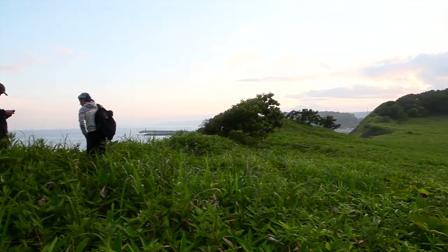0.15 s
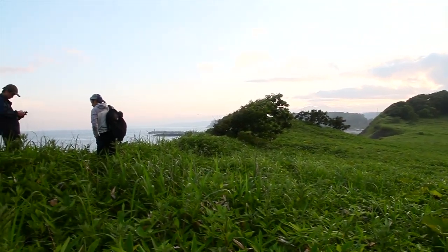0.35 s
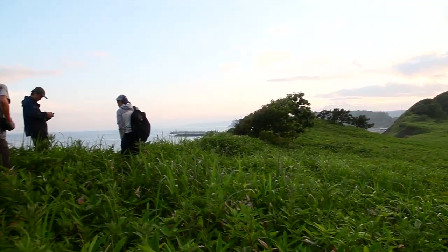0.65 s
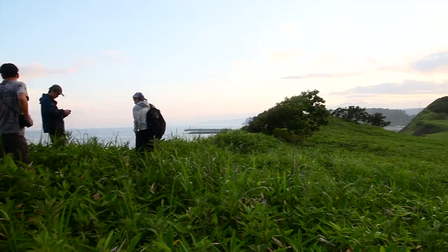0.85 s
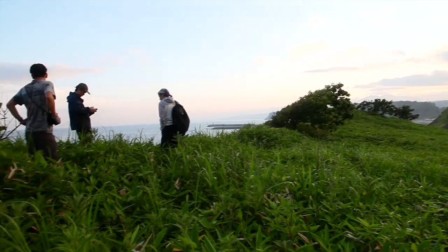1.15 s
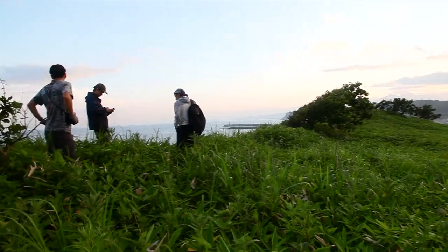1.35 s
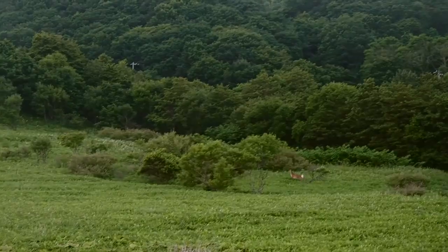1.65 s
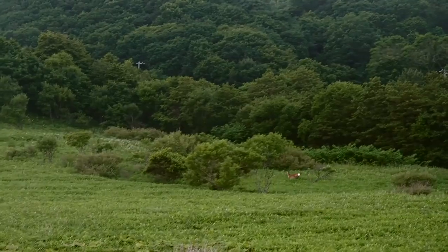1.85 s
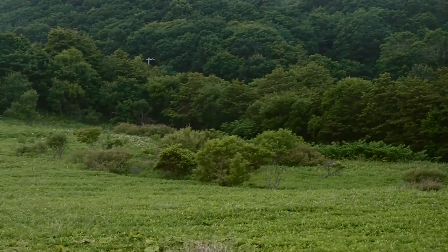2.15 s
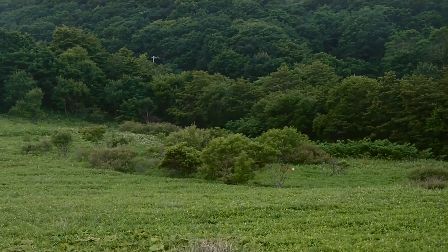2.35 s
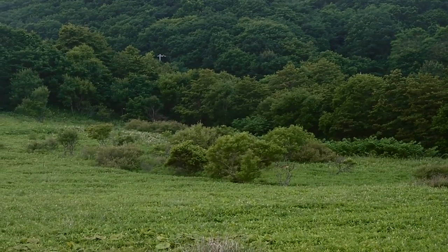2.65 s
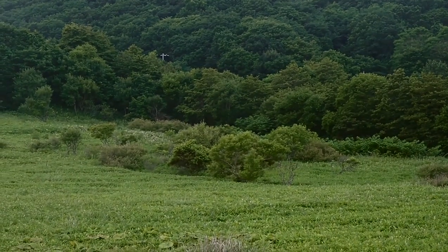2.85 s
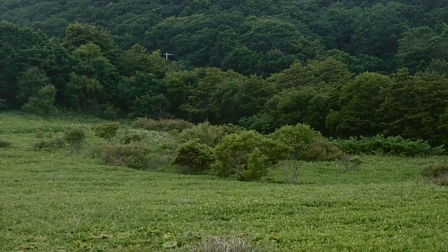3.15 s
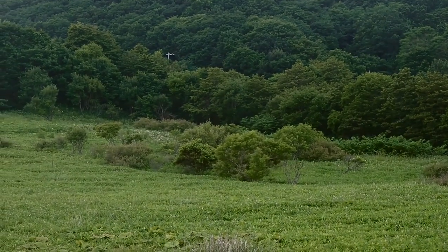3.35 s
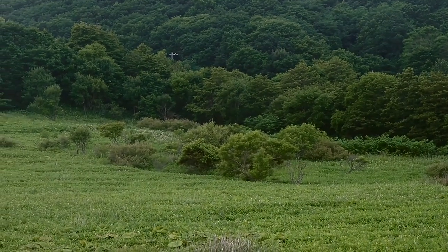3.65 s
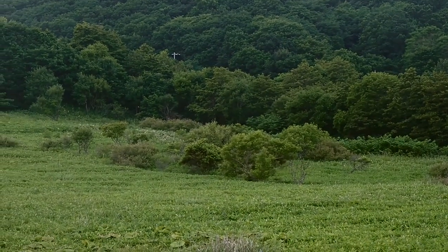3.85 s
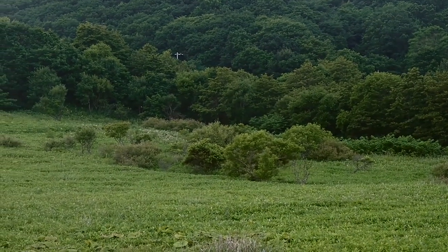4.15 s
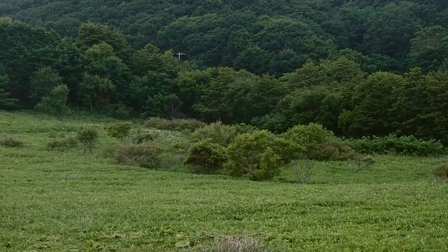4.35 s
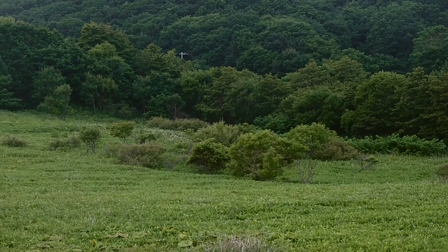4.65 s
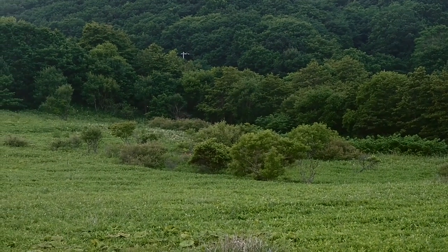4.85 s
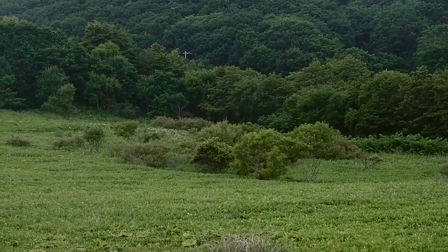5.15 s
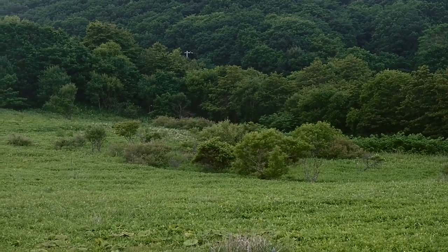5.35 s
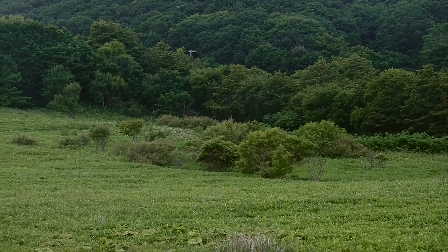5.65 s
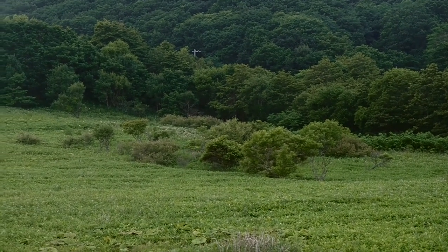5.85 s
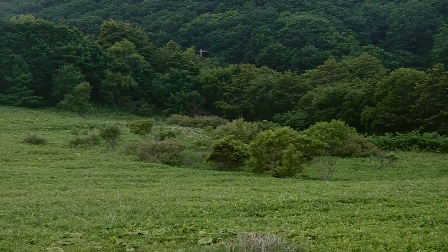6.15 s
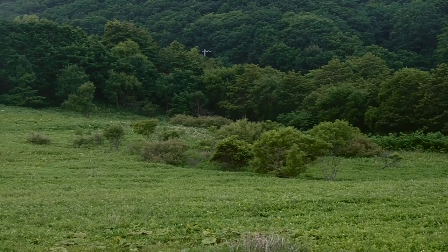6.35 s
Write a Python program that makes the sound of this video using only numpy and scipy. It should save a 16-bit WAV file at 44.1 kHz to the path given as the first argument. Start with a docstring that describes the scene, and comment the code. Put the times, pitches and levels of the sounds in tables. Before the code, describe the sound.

A grassy hillside full of high insect buzzing and quick falling chirps, under gusty microphone rumble, fading gradually and recovering slightly near the end.

```python
"""Wind on a grassy hillside rumbles on the microphone: low-passed noise in gusts, nearly alike on both sides.
A bush cricket buzzes very high, other insects rattle in trills, and near and distant singers chirp downwards:
ringing wings and sliding whistles, scattered by diffuse tails. For a second and a half tall grass hisses close by;
then the view is an open meadow with the soft rush of distant woods, both made of fluttering bands of noise."""
import sys
import numpy as np
from scipy import signal
from scipy.fft import rfft, irfft
from scipy.io import wavfile
from scipy.ndimage import uniform_filter1d

SR = 44100
rng = np.random.default_rng(int(sys.argv[2]) if len(sys.argv) > 2 else 0)


def waveform_to_disk(signal):
    """Save audio, clipped to [-1, 1], as 16-bit WAV at the path in sys.argv[1]."""
    frames = np.transpose(np.atleast_2d(signal))
    scaled = np.clip(frames, -1, 1) * 32767
    samples = np.round(scaled).astype(np.int16)
    wavfile.write(sys.argv[1], SR, samples)


N = 286650
TIME = np.arange(N) / SR
# source levels in dB, before the overall level curve
WIND_DB, GRASS_DB, WOODS_DB = -33, -44, -47.5
BUZZ_DB, SIZZLE_DB = -39.1, -49.6
NEAR_TRILL_DB, STEADY_TRILL_DB, FAR_TRILL_DB = -40.8, -46.2, -44.2
NEAR_CHIRP_DB, CHORUS_DB = -40.1, -47.9


def wind():
    """Eddies press on both sides of the microphone nearly alike, more strongly in the tall grass."""
    # rumble spectrum: (frequency [Hz], level [dB])
    rumble = [(8, -8), (20, 2.5), (32, 0), (58, -2), (75, -7), (100, -9.5), (150, -14.5), (210, -27.5),
              (400, -39), (1000, -65)]
    # rises and dips around the steady wind: (time [s], half length [s], level [dB])
    gusts = [(0.22, 0.054, 1.5), (0.44, 0.032, 1.5), (0.72, 0.019, 6), (0.98, 0.044, 3), (1.25, 0.045, 0.5),
             (2.6, 0.1, 3), (3.03, 0.074, 1), (3.39, 0.053, 1.5), (3.8, 0.036, -2.5), (4.12, .12, 1),
             (4.85, 0.21, 1), (6.28, 0.066, 0)]
    # broad, slow dips in wind level: (time [s], half length [s], depth [dB])
    slow_dips = [(2.5, .6, 2), (5.1, .4, 1.5)]
    eddies = unit(colour(rng.standard_normal(N), rumble))
    # even out each passing group of eddies, so that the gust sets its strength
    eddies /= np.sqrt(uniform_filter1d(eddies ** 2, size=SR // 5))
    apart = unit(colour(rng.standard_normal((2, N)), rumble))
    exposed_db = 0.6 * in_grass()
    waver_db = 1 * walk(5.09)
    gust_db = humps(gusts) - humps(slow_dips) + exposed_db + waver_db
    return (eddies + undb(-18.5) * apart) * undb(WIND_DB + gust_db)


def bush_cricket():
    """A very steady buzz, rung by a small stiff wing and scattered by the stems around it."""
    # wing resonance: (frequency [Hz], level [dB])
    wing = [(10000, -45), (12500, -25), (13250, -14), (13500, -3), (14200, -2), (14400, 0), (15030, 0),
            (15170, -15), (16000, -36)]
    # the buzz softens now and then: (time [s], half length [s], depth [dB])
    lulls = [(0.08, 0.13, 1.5), (0.8, 0.35, 4), (1.95, 0.18, 5), (4.3, 0.55, 3.5)]
    strokes = wing_strokes(rate=120, hz=14730, wobble=.001, uneven_db=.4, grit_db=-4)
    song = scatter(colour(strokes, wing), t60=0.04, wet_db=-7.5)
    return place(unit(song), pan_db=2.7, lag_ms=-0.0077) * undb(BUZZ_DB - humps(lulls))


def wing_strokes(rate, hz, wobble, uneven_db, grit_db):
    """Each stroke drags a file over a scraper: the wing rings in a short strong burst, then in weaker ones."""
    # bursts within one stroke: (position [share of the stroke], level [dB])
    bursts = [(.25, -1), (.35, -.5), (.52, -5), (.75, -9)]
    burst_share, rest_db = .047, -17  # burst width [share of the stroke], scrape between bursts [dB]
    spread_hz, teeth_per_s = 240, 1100  # how the ring wavers from tooth to tooth
    cycles = stroke_cycles(rate, wobble)
    push = undb(rest_db)
    for at, db in bursts:
        push = push + undb(db) * np.exp(-((cycles % 1 - at) / burst_share) ** 2 / 2)
    size = undb(uneven_db * rng.standard_normal(N // 100))[cycles.astype(int)]
    pitch = hz + spread_hz * walk(teeth_per_s)
    ring = np.sin(2 * np.pi * np.cumsum(pitch) / SR)
    return push * size * (ring + undb(grit_db) * rng.standard_normal(N))


def stroke_cycles(rate, wobble):
    """Running count of wing strokes at a wavering pace; the fraction is the place within a stroke."""
    return np.cumsum(rate * (1 + wobble * walk(12))) / SR + rng.random()


def trills():
    """The nearest singer rattles in bouts; a second, lower one sings on; five more waver further away."""
    # wing resonance of the two closer singers: (frequency [Hz], level [dB])
    wing = [(6800, -22), (7900, 21), (8350, -10.5), (8700, 11), (8950, -23), (10000, -24)]
    # wing resonance of the far singers: (frequency [Hz], level [dB])
    far_wing = [(5500, -27), (6700, -5.5), (7400, -5.5), (7900, -2), (8350, 6), (8650, 6.5), (8950, -15),
                (9300, -61), (10000, -28)]
    # short dips in the closer trills; at the last two only the steady one sings:
    # (time [s], half length [s], depth [dB])
    short_dips = [(3.26, 0.026, 7), (3.82, 0.11, 13), (5.72, 0.074, 18)]

    near = rattle(rate=104.2, hz=8290, wobble=0.015, uneven_db=2.0, spread=.012, grit_db=-12)
    near = near * undb(1.5 * walk(14))
    near = unit(scatter(colour(near, wing), t60=0.033, wet_db=-15))
    near = place(near, pan_db=2.4, lag_ms=0.18) * trill_bouts()

    steady = rattle(rate=102.8, hz=7930, wobble=.012, uneven_db=1.5, spread=.01, grit_db=-12)
    steady = steady * undb(1.8 * walk(14))
    steady = unit(scatter(colour(steady, wing), t60=0.034, wet_db=-9))
    steady = place(steady, pan_db=0, lag_ms=0.18)

    far = np.zeros(N)
    for hz in np.linspace(7250, 8400, 5):
        rate = 102 * rng.uniform(.85, 1.15)
        singer = rattle(rate, hz=hz, wobble=.03, uneven_db=2.5, spread=.02, grit_db=0)
        far += singer * undb(2.5 * walk(12))
    far = unit(colour(scatter(far, t60=.06, wet_db=-2), far_wing))
    far = place(far, pan_db=3.8, lag_ms=0.16)

    close = near * undb(NEAR_TRILL_DB) + steady * undb(STEADY_TRILL_DB)
    return close * undb(-humps(short_dips)) + far * undb(FAR_TRILL_DB)


def trill_bouts():
    """1 while the near singer rattles, 0 between bouts, with a slow attack and a quicker release."""
    # bouts: (start [s], end [s])
    bouts = [(-.3, 0.45), (1.55, 3.57)]
    attack_s, release_s = .3, 0.064
    singing = np.zeros(N)
    for start, end in bouts:
        edge = np.minimum((TIME - start) / attack_s, (end - TIME) / release_s)
        singing += np.clip(edge + .5, 0, 1)
    return singing


def rattle(rate, hz, wobble, uneven_db, spread, grit_db):
    """Each wing stroke rings briefly and slides down in pitch as the file slows on the scraper."""
    stroke_s, fall_hz_per_s = .0018, 128000  # half length and slide of one stroke
    cycles = stroke_cycles(rate, wobble)
    size, detune = rng.standard_normal((N // 100, 2))[cycles.astype(int)].T
    t = (cycles % 1 - .5) / rate  # seconds from the middle of the stroke
    pitch = hz * (1 + spread * detune) - fall_hz_per_s * t
    tone = np.sin(2 * np.pi * np.cumsum(pitch) / SR)
    grit = rng.standard_normal(N)
    return np.exp(-(t / stroke_s) ** 2 / 2) * undb(uneven_db * size) * (tone + undb(grit_db) * grit)


def chirpers():
    """Near singers chirp in evenly paced runs in front of a crowd of faint ones of the same kind."""
    # near runs, steady or hurried: (start [s], length [s], pace [chirps/s], pitch [Hz], strength [dB])
    runs = [(0.061, .36, 12.3, 3690, .5), (0.12, .18, 17, 3820, -1.5), (0.463, .15, 15, 3580, -3),
            (0.85, .17, 21.5, 3570, -2.5), (1.08, .52, 12.4, 3590, -1.5), (1.637, .06, 20.7, 3590, -2.5),
            (1.733, .07, 19, 3600, 2.5), (1.858, .12, 19.5, 3600, -1), (2.053, .07, 23, 3590, -.5),
            (2.178, .52, 12.5, 3610, 1.5), (2.701, .37, 20.4, 3590, 1.5), (3.128, .2, 12.3, 3590, .5),
            (3.372, .2, 12.9, 3590, -4), (3.643, .18, 17.9, 3620, -3), (4.17, .54, 12.1, 3560, -2.5),
            (4.77, .02, 12, 3600, -2), (4.934, .07, 20, 3580, -1.5), (5.075, .14, 18.8, 3590, -.5),
            (5.448, .77, 12.25, 3590, .3), (5.93, .2, 12.5, 3760, -3.5), (6.09, .26, 13, 3880, -3.5),
            (6.228, .25, 18.4, 3590, 0)]
    # level of the distant crowd: dips (time [s], half length [s], depth [dB])
    crowd_dips = [(1.5, 0.73, 4), (5.2, 0.99, 3)]
    near = sum(chirp_run(*run) for run in runs)
    near = place(scatter(near, t60=0.21, wet_db=-12.5), pan_db=2.0, lag_ms=0.081)
    crowd = sum(distant_singer(hz) for hz in np.linspace(3300, 4100, 13))
    crowd = place(unit(scatter(crowd, t60=0.25, wet_db=-1.5)), pan_db=0, lag_ms=.07)
    return near * undb(NEAR_CHIRP_DB) + crowd * undb(CHORUS_DB - humps(crowd_dips))


def chirp_run(start, length, rate, hz, db):
    """One near singer repeats its chirp at an even pace, each a little louder or softer."""
    beats = start + np.arange(0, length, 1 / rate)
    rows = [(s, db + 1 * rng.standard_normal()) for s in beats]  # 1 dB scatter
    return chirp_train(rows, hz=hz, spread=0.009, fall_hz_per_s=15000, rise=.008, decay=0.0062)


def distant_singer(hz):
    """An unbroken run of chirps loosely keeping one pace, some carrying further than others."""
    # how loud the crowd is at each pitch: (pitch [Hz], relative level [dB])
    loudness = [(3300, -4), (3420, -2), (3550, 0), (3780, 1), (3920, -1.5), (4100, -4)]
    period = 1 / rng.uniform(12, 20)  # 12 to 20 chirps per second
    beats = np.arange(period * rng.random(), N / SR, period)
    late, strength = rng.standard_normal((200, 2))[:len(beats)].T
    rows = list(zip(beats + .1 * period * late, 2 * strength))  # 2 dB scatter
    song = chirp_train(rows, hz=hz, spread=.018, fall_hz_per_s=16100, rise=0.009, decay=0.0065)
    return song * undb(along(loudness, hz))


def chirp_train(rows, hz, spread, fall_hz_per_s, rise, decay):
    """Whistles sliding down in pitch, ending quicker than they swell, each with its own slide and length."""
    length_spread, slide_spread = .15, .2  # from chirp to chirp, as shares
    t = np.arange(-SR // 32, SR // 32) / SR
    width = np.where(t < 0, rise, decay)
    out = np.zeros(N + 2 * len(t))
    for (s, db), (detune, turn, slide, stretch) in zip(rows, rng.standard_normal((len(rows), 4))):
        shape = np.exp(-(t / (width * np.exp(length_spread * stretch))) ** 2 / 2)
        pitch = hz * (1 + spread * detune)
        fall = fall_hz_per_s * (1 + slide_spread * slide)
        phase = pitch * t - fall * t ** 2 / 2 + turn  # in turns
        start = int(np.clip(s * SR, 0, N))
        out[start:start + len(t)] += undb(db) * shape * np.sin(2 * np.pi * phase)
    return out[len(t) // 2:][:N]


def plants():
    """Brushing blades of tall grass close by give way to the rush of woods across the meadow."""
    # spectra: (frequency [Hz], level [dB])
    grass_spectrum = [(90, -9), (200, 4.5), (300, 4), (450, 1.1), (700, 1.1), (1200, -3.5), (2000, -7.5),
                      (3000, -9.5), (5000, -11.5), (7000, -14), (9500, -16), (12000, -16.5), (16000, -24)]
    woods_spectrum = [(90, -11), (200, -1.5), (265, 1.5), (350, -5), (500, -0.4), (580, -3.5), (720, 0.5),
                      (1000, -5), (1230, -5), (1550, -10), (2200, -12), (3000, -15.5), (5000, -17.5),
                      (6500, -23.5), (10000, -24), (16000, -38)]
    # likeness of left and right: (frequency [Hz], correlation [-])
    grass_likeness = [(200, 0.86), (700, 0.84), (2000, 0.66), (4000, 0.33), (6000, 1), (12000, 0.67)]
    woods_likeness = [(200, 0.93), (700, 0.95), (1200, 1), (2000, 0.14), (6000, 0.72)]
    close = in_grass()
    grass = foliage(grass_spectrum, grass_likeness, flutter_db=1.08, flutter_rate=14.3)
    grass = place(grass, pan_db=2.0, lag_ms=0)
    woods = foliage(woods_spectrum, woods_likeness, flutter_db=1.17, flutter_rate=9)
    woods = place(woods, pan_db=0.0, lag_ms=.16)
    return grass * close * undb(GRASS_DB) + woods * (1 - close) * undb(WOODS_DB)


def foliage(spectrum, likeness, flutter_db, flutter_rate):
    """Countless brushing leaves: shaped stereo noise in octave bands that each flutter on their own."""
    hz = np.fft.rfftfreq(N, 1 / SR)
    alike = np.clip(along(likeness, hz), 0, 1)
    mid, side = rfft(rng.standard_normal((2, N)))
    shared = mid * np.sqrt(1 + alike)
    opposed = np.array([[1], [-1]]) * side * np.sqrt(1 - alike)
    pair = (shared + opposed) * undb(along(spectrum, hz))
    # rms 1 in the middle range, before the flutter
    pair /= np.std(irfft(pair * ((hz > 400) & (hz < 1500)), N))
    octave = np.log2((hz + 1) / 125)
    out = np.zeros((2, N))
    for k in range(8):
        band = irfft(pair * np.maximum(1 - abs(octave - k), 0), N)
        out += band * undb(flutter_db * walk(flutter_rate))
    return out


def in_grass():
    """1 while the tall grass is close, 0 once the view is the meadow, with a 17 ms crossing."""
    return np.clip((1.51 - TIME) / 0.017 + .5, 0, 1)


def far_crickets():
    """Further bush crickets, each at its own pace and a lower pitch, blur into a sizzle from all sides."""
    # wing resonance: (frequency [Hz], level [dB])
    wing = [(10000, -40), (11900, -14), (12350, -2), (13000, 0), (13230, -7), (13500, -1), (15000, -2),
            (15200, -20), (16000, -40)]
    # singers: (pitch [Hz], pace [strokes/s], relative strength [dB])
    crickets = [(12520, 92, 0), (12950, 134, 1), (13650, 109, -1.5), (14100, 142, -1)]
    singers = np.zeros(N)
    for hz, rate, db in crickets:
        strokes = wing_strokes(rate, hz=hz, wobble=0.056, uneven_db=4.0, grit_db=-2)
        singers += strokes * undb(db + 2.9 * walk(7.7))
    return unit(scatter(colour(singers, wing), t60=0.14, wet_db=11)) * undb(SIZZLE_DB)


def scatter(x, t60, wet_db):
    """Stems and slopes add a diffuse tail, different on each side."""
    t = TIME[:SR // 2]
    tail = rng.standard_normal((2, len(t))) * np.exp(-np.log(1000) * t / t60)
    tail /= np.sqrt(np.sum(tail ** 2, axis=1, keepdims=True))
    return x + undb(wet_db) * signal.fftconvolve(x[None], tail, axes=1)[:, :N]


def place(pair, pan_db, lag_ms):
    """Direction: positive values make the left louder by pan_db and later by lag_ms."""
    left = delay(pair[0], lag_ms / 1000) * undb(pan_db / 2)
    right = pair[1] * undb(-pan_db / 2)
    return np.array([left, right])


def delay(x, seconds):
    """Shift a sound in time by turning the phase of its spectrum."""
    return irfft(rfft(x) * np.exp(-2j * np.pi * np.fft.rfftfreq(N, 1 / SR) * seconds), N)


def colour(x, points):
    """Filter by a spectrum of (frequency [Hz], level [dB]) points."""
    return irfft(rfft(x) * undb(along(points, np.fft.rfftfreq(N, 1 / SR))), N)


def along(points, hz):
    """Read (frequency [Hz], value) points on a log-frequency axis."""
    f, value = np.transpose(points)
    return np.interp(np.log(hz + 1), np.log(f), value)


def walk(rate):
    """Random levels held 1 / rate s and smoothed twice; rms 1."""
    k = max(int(SR / rate), 1)
    held = np.repeat(rng.standard_normal(N // k + 2), k)[rng.integers(k):][:N]
    return unit(uniform_filter1d(uniform_filter1d(held, k), k))


def humps(rows):
    """Smooth bell-shaped humps from rows of (time [s], half length [s], height [dB])."""
    return sum(db * np.exp(-((TIME - s) / half) ** 2) for s, half, db in rows)


def curve(rows):
    """Rows of (time [s], value) as a value for each sample."""
    return np.interp(TIME, *np.transpose(rows))


def unit(x):
    """Scale to rms 1."""
    return x / np.sqrt(np.mean(x ** 2))


def undb(db):
    """Decibels to gain."""
    return 10 ** (np.asarray(db) / 20)


def scene():
    """The whole sound fades slowly and comes back a little."""
    # overall level: (time [s], level [dB])
    overall_level = [(0, -0.5), (1.45, -1), (1.7, -3.5), (3.0, -8), (4.45, -13.5), (5.4, -11), (6.5, -9.5)]
    insects = bush_cricket() + trills() + chirpers() + far_crickets()
    return (wind() + insects + plants()) * undb(curve(overall_level))


def record(dry):
    """A steep low-pass at 15350 Hz leaves out the very top."""
    low_pass = signal.ellip(10, .1, 80, 15350, fs=SR, output="sos")
    return signal.sosfilt(low_pass, dry)


dry = scene()
out = record(dry)
waveform_to_disk(out)
```